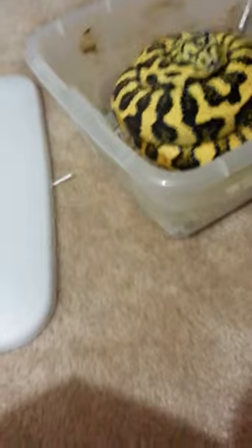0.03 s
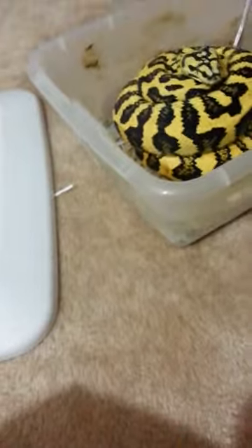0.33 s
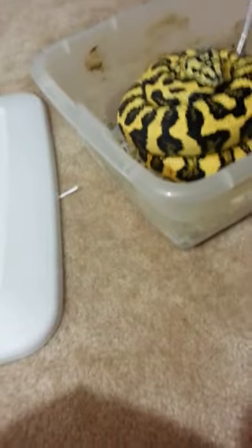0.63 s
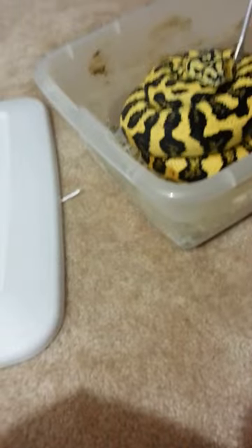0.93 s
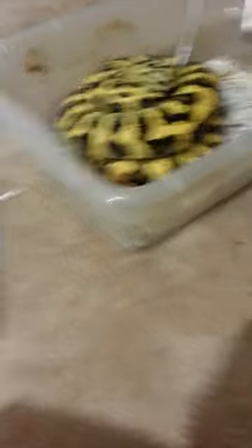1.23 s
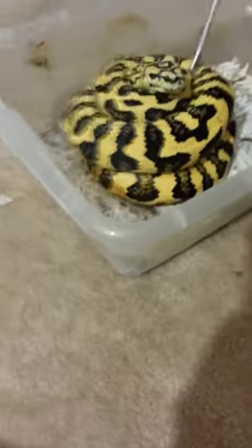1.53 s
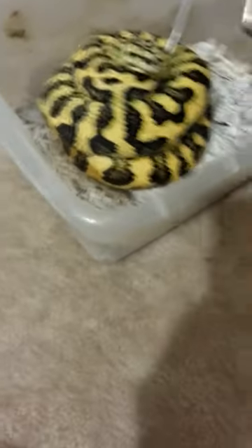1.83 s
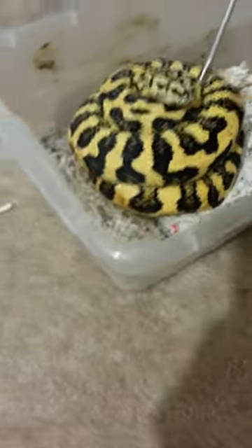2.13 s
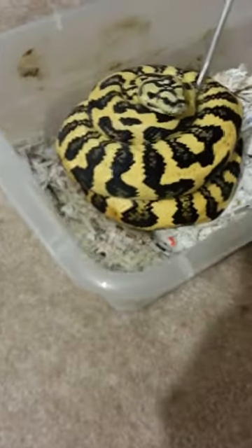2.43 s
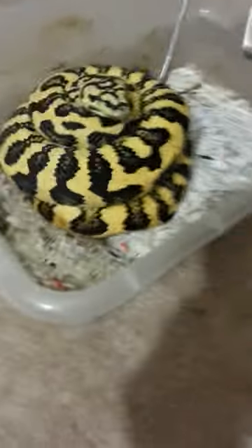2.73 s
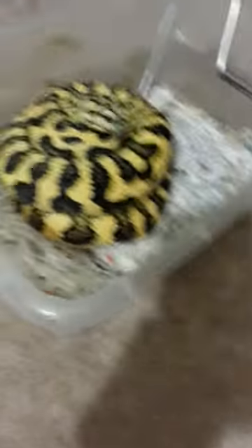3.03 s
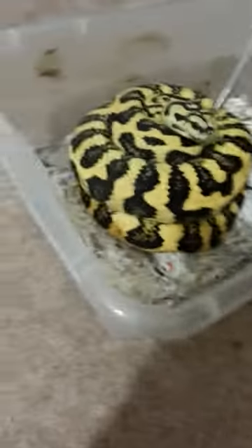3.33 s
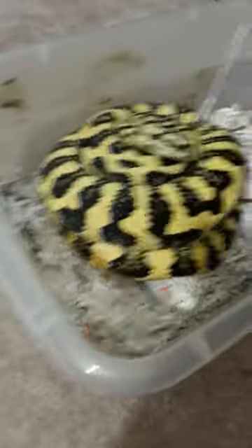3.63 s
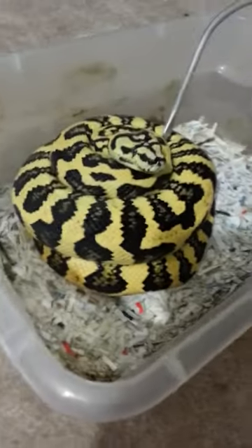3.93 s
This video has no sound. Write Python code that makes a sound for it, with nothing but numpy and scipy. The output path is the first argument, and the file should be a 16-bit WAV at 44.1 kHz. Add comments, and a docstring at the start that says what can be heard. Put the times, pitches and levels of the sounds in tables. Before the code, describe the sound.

A snake hisses softly at about 0.5 seconds, then harder and longer from 1.3 to 2 seconds, with a light bedding rustle and a few sharp clicks. A faint in-breath follows until 2.8 seconds. From 2.7 seconds to the end, a hand on the microphone makes rapid dry clicks, gritty rubbing and soft bumps, close on the left. A small room hums faintly underneath.

```python
"""A coiled python in a plastic tub hisses twice, softly then hard, and draws air back in.
Its breath is a turbulent jet, coloured by the resonances of the mouth. A hook stirs its bedding.
Close to the left microphone a grip on the phone sticks and slips: impulses ring the case as dry
clicks, and sliding friction adds gritty strokes. Tub and hand bump softly, and a small carpeted
room hums underneath."""
import sys
import numpy as np
from scipy import signal
from scipy.fft import rfft, irfft
from scipy.io import wavfile

SR = 44100
rng = np.random.default_rng(int(sys.argv[2]) if len(sys.argv) > 2 else 0)


def waveform_to_disk(signal):
    """Save audio, clipped to [-1, 1], as 16-bit WAV at the path in sys.argv[1]."""
    frames = np.transpose(np.atleast_2d(signal))
    scaled = np.clip(frames, -1, 1) * 32767
    samples = np.round(scaled).astype(np.int16)
    wavfile.write(sys.argv[1], SR, samples)


N = 176400
TIME = np.arange(N) / SR

# Air flow of the three breaths. Each row: time in seconds, level in dB.
SOFT_HISS_FLOW = [(.44, -93), (.475, -59), (.505, -46), (.56, -45.5), (.615, -49.5), (.68, -61), (.79, -63),
                  (.86, -80)]
HARD_HISS_FLOW = [(1.23, -72), (1.29, -48), (1.345, -38.5), (1.42, -37), (1.79, -41), (1.94, -48),
                  (2.02, -76)]
IN_BREATH_FLOW = [(2.0, -83), (2.15, -68.5), (2.6, -68), (2.8, -65)]
# Resonances of the mouth. Each row: centre in Hz, bandwidth in Hz, gain in dB.
MOUTH_RESONANCES = [(3270, 310, 2.5), (5780, 780, 6.4), (12200, 1100, 2)]
# Slips of the grip. Each row: start in seconds, then bright ring, knock and thump levels in dB.
GRIP_SLIPS = [(0.1656, -39, -34, -58), (1.0086, -21.5, -26, -39), (1.198, -15.5, -29, -34),
              (1.439, -20, -29.5, -36), (1.8108, -5.5, -23, -39), (1.906, -24, -27, -42),
              (2.734, -3.5, -33, -33.5), (2.8107, -17.5, -20.5, -28.5), (2.8238, -20, -22.5, -32),
              (2.8591, -17, -15.5, -34), (2.8729, -18.5, -16, -30), (2.9754, -14.5, -13, -33),
              (3.044, -10, -34, -26.5), (3.0655, -21, -7, -26.5), (3.1268, -24, -32, -37),
              (3.1565, -32.5, -21, -32.5), (3.2478, -27, -27, -34.5), (3.2576, -25, -14, -29.5),
              (3.305, -22.5, -21, -34), (3.3425, -28, -13, -28.5), (3.4167, -22.5, -21, -34.5),
              (3.4572, -27, -19.5, -34.5), (3.5078, -21, -22.5, -32), (3.5511, -26.5, -20, -42),
              (3.597, -23, -19, -39), (3.648, -23.5, -23, -35), (3.7147, -21.5, -17.5, -32),
              (3.8834, -14.5, -16, -32.5)]
# Modes of each click: bright ring, knock of the case, two of the thump. Each row: frequency in Hz, time to peak
# in ms.
CLICK_MODES = [(5680, 0.12), (2324, 0.26), (677, 0.53), (203, 1.65)]
# Friction strokes of grip and bedding; the last bedding row is a longer slide of the grip. Each row: start in
# seconds, length in seconds, level in dB.
LIGHT_STROKES = [(.101, 0.0097, -56), (1.199, 0.017, -42.5), (2.744, 0.019, -31), (2.815, 0.064, -34),
                 (2.88, 0.19, -41), (2.978, 0.066, -32.5), (3.012, 0.034, -31), (3.062, 0.031, -35)]
PRESSED_STROKES = [(3.157, 0.011, -38.5), (3.259, 0.014, -38.5), (3.337, 0.059, -37), (3.41, 0.11, -45),
                   (3.55, 0.061, -48)]
BEDDING_STROKES = [(.128, 0.053, -55.5), (1.4, 0.44, -50.5), (1.725, 0.034, -39), (1.825, 0.055, -42.5),
                   (3.38, 0.29, -53)]
# Bumps of tub and hand. Each row: start in seconds, frequency in Hz, level in dB, decay in seconds.
SOFT_BUMPS = [(0.13, 226, -39.5, 0.029), (0.858, 268, -44, 0.011), (2.532, 63, -37.5, 0.028),
              (3.886, 148, -42, 0.055)]
# Rumble of the moving hand. Each row: time in seconds, level in dB.
RUMBLE_LEVELS = [(1.05, -63), (1.45, -53), (1.88, -54.5), (2.03, -69), (2.65, -55.5), (2.85, -48.5),
                 (3.45, -58), (3.95, -61)]
# Tones of an appliance. Each row: frequency in Hz, level in dB.
HUM_TONES = [(120, -58.5), (215.2, -60)]
# Spectra of the noise sources. Each row: frequency in Hz, relative level in dB.
JET_SPECTRUM = [(300, -4.5), (1400, -7), (3700, -2.5), (4700, -3), (7000, 4), (9800, 1.5), (14500, -2.5)]
LIGHT_SPECTRUM = [(150, -7.5), (1100, -14), (2600, -6.5), (3900, -10.5), (5200, -0.5), (6100, -1.5),
                  (8500, -8.5), (14500, -18)]
PRESSED_SPECTRUM = [(150, -3.5), (1200, -9.5), (2150, 1.5), (3100, -9.5), (4500, -4.5), (6300, -11),
                    (14500, -21.5)]
BEDDING_SPECTRUM = [(200, 1.5), (1400, -3), (2900, 3.5), (6000, -1.5), (14500, -13.5)]
RUMBLE_SPECTRUM = [(25, -21), (150, 0), (800, -6.5), (5000, -21)]
AIR_SPECTRUM = [(25, -34), (110, -10), (270, -0.5), (2200, -10), (3200, -21), (7000, -30.5), (14500, -25)]
# Microphone ports, left then right. Each row: centre in Hz, bandwidth in Hz, resonance gain in dB.
PORT_RESONANCES = [(5140, 2530, 2), (6950, 630, 14)]


def amp(db):
    """Amplitude ratio of a level in decibels."""
    return 10 ** (np.asarray(db) / 20)


def unit(x):
    """Normalisation to rms 1."""
    return x / np.sqrt(np.mean(x ** 2) + 1e-20)


def envelope(points):
    """Gain interpolated through (seconds, dB) points, silent outside them."""
    return amp(np.interp(TIME, *np.array(points).T, left=-150, right=-150))


def pan(db):
    """Stereo gains with the left side db above the right."""
    return amp(np.array([[db], [-db]]) / 2)


def colour(x, spectrum):
    """Spectral shaping by (Hz, dB) points, to rms 1."""
    hz, db = np.array(spectrum).T
    bin_hz = np.fft.rfftfreq(N, 1 / SR) + 1
    return unit(irfft(rfft(x) * amp(np.interp(np.log(bin_hz), np.log(hz), db)), N))


def resonate(x, hz, width_hz):
    """Two-pole resonance, gain 1 at the centre."""
    return signal.lfilter(*signal.iirpeak(hz, hz / width_hz, fs=SR), x)


def lowpass(x, hz):
    """Second-order low-pass."""
    return signal.sosfilt(signal.butter(2, hz, fs=SR, output="sos"), x)


def noise():
    """White noise, uncorrelated left and right."""
    return rng.standard_normal((2, N))


def wander(hz):
    """Slow random fluctuation of rms 1."""
    return unit(lowpass(rng.standard_normal(N), hz))


def shared_bass(hz):
    """Stereo noise whose sides are correlated below hz."""
    own = noise()
    return own + lowpass(own[::-1], hz)


def breath(flow):
    """Turbulence: jet noise plus mouth resonances, duller when the flow is weak."""
    dull_slope, flutter_db = 0.49, 1  # the dull band's share gains 0.49 dB per dB less flow
    jet = colour(noise(), JET_SPECTRUM)
    mouth = sum(amp(db) * resonate(noise(), hz, width) for hz, width, db in MOUTH_RESONANCES)
    dull_band = unit(resonate(noise(), hz=2740, width_hz=1650)) * amp(-14) * pan(12)
    dullness = (flow / flow.max()) ** -dull_slope
    return (unit(jet + mouth) + dull_band * dullness) * flow * amp(flutter_db * wander(hz=28))


def snake():
    """Flow sets loudness: two hisses out, then a quiet breath in."""
    hisses = breath(envelope(SOFT_HISS_FLOW) + envelope(HARD_HISS_FLOW))
    in_breath = breath(envelope(IN_BREATH_FLOW))
    return hisses * pan(-3.6) + in_breath * pan(12)


def grip_clicks():
    """Stick-slip: each release cracks, sets off a brief bright ring and the damped modes of the case, and
    leaves a thud."""
    crack_decay_s, thud_decay_s, thud_hz = 0.00052, 0.0089, 293
    knock_octaves_per_db = 0.07  # sharper slips knock higher
    median_bright_db = np.median(np.array(GRIP_SLIPS)[:, 1])
    out, t = np.zeros((2, N)), TIME[:SR // 10]
    for start, bright_db, knock_db, thump_db in GRIP_SLIPS:
        crack_noise, thud_noise = rng.standard_normal((2, 2, len(t)))
        detunes = 1 + 0.1 * rng.standard_normal((len(CLICK_MODES), 2, 1))
        detunes[1] *= 2 ** (knock_octaves_per_db * (bright_db - median_bright_db))
        mode_levels = (bright_db, knock_db, thump_db, thump_db)
        click = 0
        for (hz, peak_ms), db, detune in zip(CLICK_MODES, mode_levels, detunes):
            age = t * 1000 / peak_ms
            click += amp(db) * age * np.exp(1 - age) * np.sin(2 * np.pi * hz * detune * t)
        crack = unit(resonate(crack_noise, hz=3600, width_hz=7100))
        thud = unit(resonate(lowpass(thud_noise, 2 * thud_hz), thud_hz, thud_hz))
        click += amp((bright_db + knock_db) / 2 - 5.5) * crack * np.exp(-t / crack_decay_s)
        click += amp(thump_db - 1.5) * thud * np.exp(-t / thud_decay_s)
        onset = int(start * SR)
        out[:, onset:onset + len(t)] += click[:, :N - onset]
    return out * amp([[0], [-19]])  # weaker at the far microphone


def friction(strokes, spectrum, rise_s, fall_s, catches_per_s):
    """Shot noise: rubbing makes dense, uneven catches; overlapping strokes add in power."""
    catches = (rng.random((2, N)) < catches_per_s / SR) * noise()
    power = 0
    for start, length, db in strokes:
        attack = np.clip((TIME - start) / rise_s, 0, 1)
        release = np.exp(-np.maximum(TIME - start - length, 0) / fall_s)
        power += (attack * release * amp(db)) ** 2
    return colour(catches, spectrum) * np.sqrt(power)


def grip_slides():
    """Sliding friction by the left microphone: bright under a light grip, dull when pressed."""
    grit = dict(rise_s=0.0016, fall_s=0.0079, catches_per_s=14000)
    light = friction(LIGHT_STROKES, LIGHT_SPECTRUM, **grit)
    pressed = friction(PRESSED_STROKES, PRESSED_SPECTRUM, **grit)
    return (light + pressed) * amp([[0], [-21]])


def bedding_rustle():
    """Granular friction: the hook stirs the bedding in sparser catches; late on, a slide of the grip rubs in
    the same way."""
    rustle = friction(BEDDING_STROKES, BEDDING_SPECTRUM, rise_s=0.01, fall_s=0.017, catches_per_s=2000)
    return rustle * pan(6.5)


def hand_rumble():
    """Structure-borne noise: the moving hand makes a low rumble."""
    return colour(shared_bass(hz=330), RUMBLE_SPECTRUM) * envelope(RUMBLE_LEVELS) * pan(6)


def bumps():
    """Damped resonance: each soft impact of tub or hand is a decaying band of low noise."""
    out, rise_s = 0, 0.00033
    for start, hz, db, decay_s in SOFT_BUMPS:
        age, width_hz = np.maximum(TIME - start, 0), 0.73 * hz
        body = unit(resonate(resonate(shared_bass(hz=470), hz, width_hz), hz, width_hz))
        out += amp(db) * body * np.exp(-age / decay_s) * (1 - np.exp(-age / rise_s))
    return out


def room_reverb(source, decay_s=0.015):
    """Absorption: reflections die away quickly in a carpeted room."""
    tail = noise()[:, :SR // 2] * np.exp(-TIME[:SR // 2] / decay_s)
    tail /= np.sqrt(np.sum(tail[0] ** 2))
    return signal.fftconvolve(source, tail, axes=1)[:, :N]


def room_tone():
    """Random modulation: an appliance's hum wavers in level and phase over faint air noise."""
    hum, waver_db, drift_rad = 0, 3, 0.6
    for hz, db in HUM_TONES:
        peak = np.sqrt(2) * amp(db + waver_db * wander(hz=10))
        hum += peak * np.sin(2 * np.pi * hz * TIME + drift_rad * wander(hz=4.5))
    air = amp(-56 + wander(hz=10.4)) * colour(shared_bass(hz=245), AIR_SPECTRUM)
    return hum * pan(2.5) + air


def scene():
    """Superposition of snake, grip, bedding and room; only the clicks reverberate."""
    clicks = grip_clicks()
    reverb = amp(4) * room_reverb(clicks[1:])  # fed by the weaker right side
    rubbing = grip_slides() + bedding_rustle()
    return snake() + clicks + rubbing + hand_rumble() + bumps() + reverb + room_tone()


def record(dry):
    """Port resonance colours each side; the phone thins the bass, clips, fades in and cuts the top."""
    low_cut_hz, high_cut_hz, start_s, fade_s = 47, 14500, 0.079, 0.04
    ported = np.array([side + amp(db) * resonate(side, hz, width)
                       for side, (hz, width, db) in zip(dry, PORT_RESONANCES)])
    thinned = signal.sosfilt(signal.butter(2, low_cut_hz, "high", fs=SR, output="sos"), ported)
    faded_in = np.clip(thinned, -1, 1) * np.clip((TIME - start_s) / fade_s, 0, 1)
    return signal.sosfilt(signal.ellip(10, .2, 70, high_cut_hz, fs=SR, output="sos"), faded_in)


dry = scene()
out = record(dry)
waveform_to_disk(out)
```